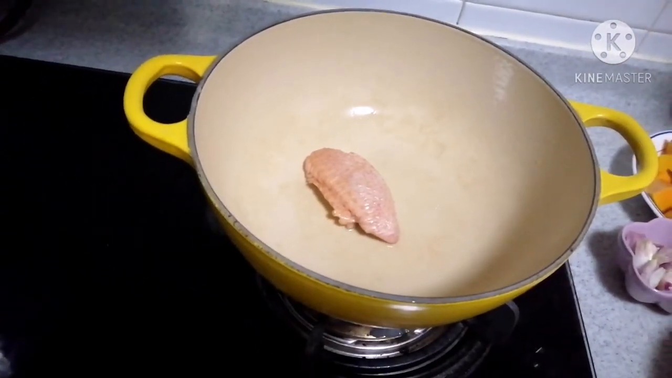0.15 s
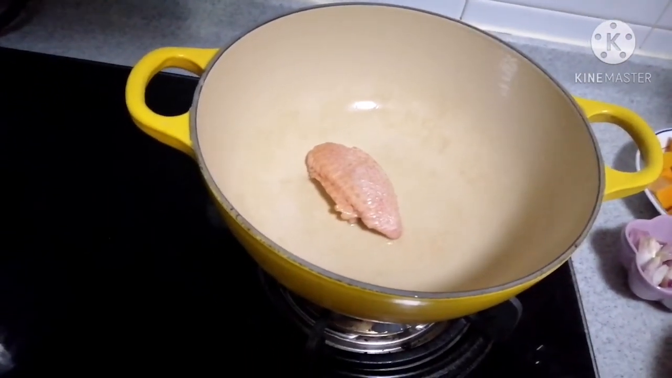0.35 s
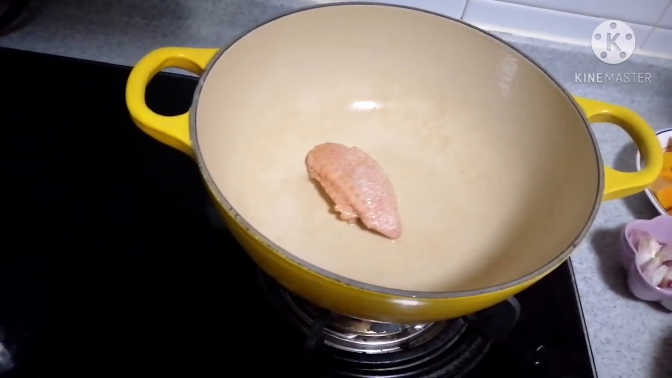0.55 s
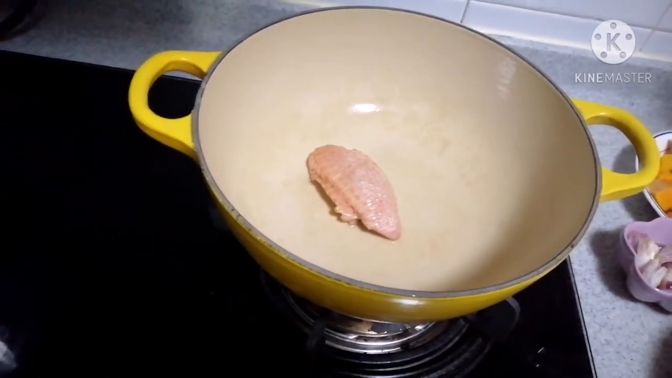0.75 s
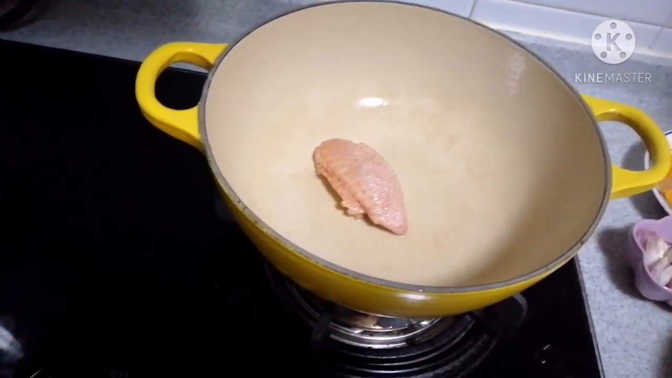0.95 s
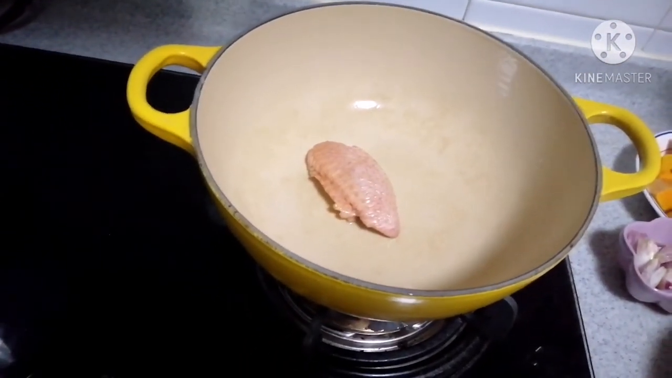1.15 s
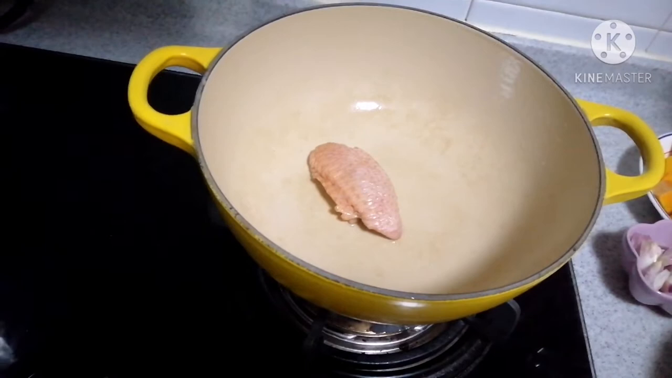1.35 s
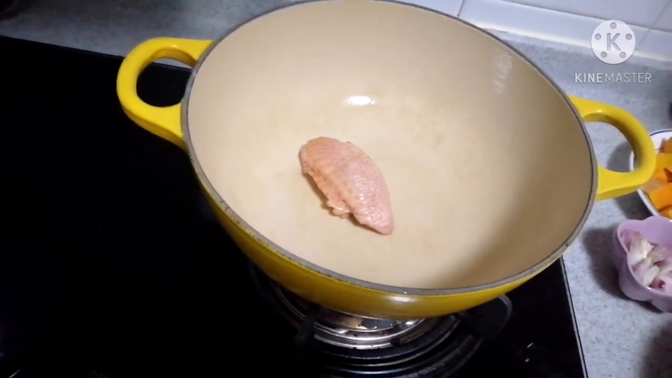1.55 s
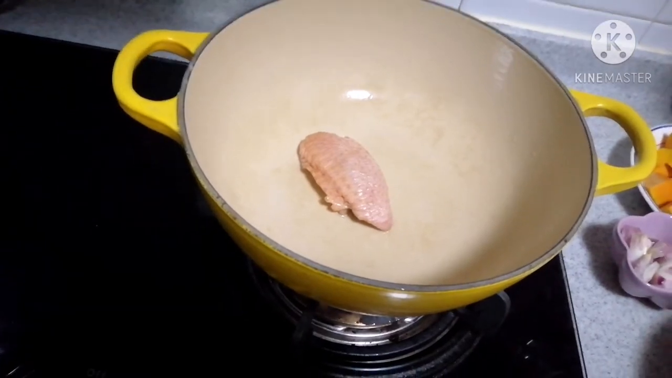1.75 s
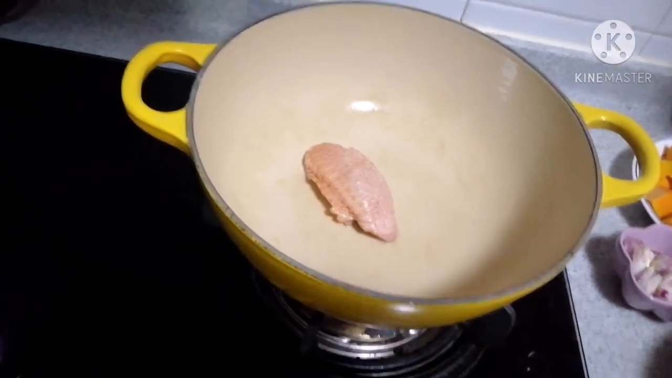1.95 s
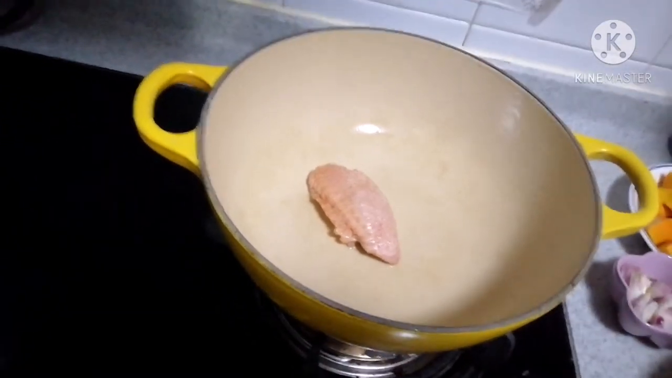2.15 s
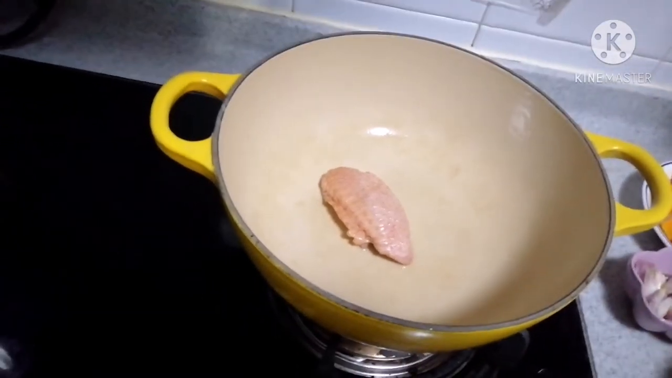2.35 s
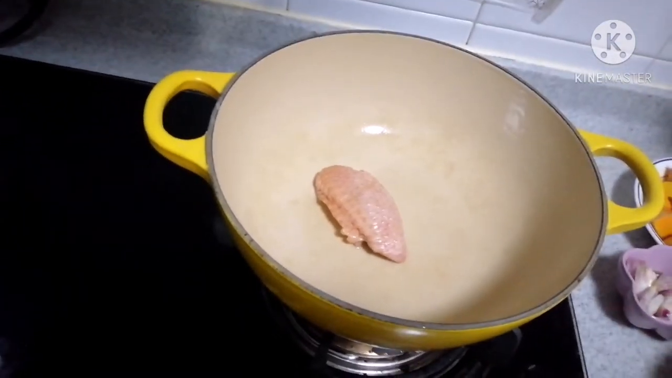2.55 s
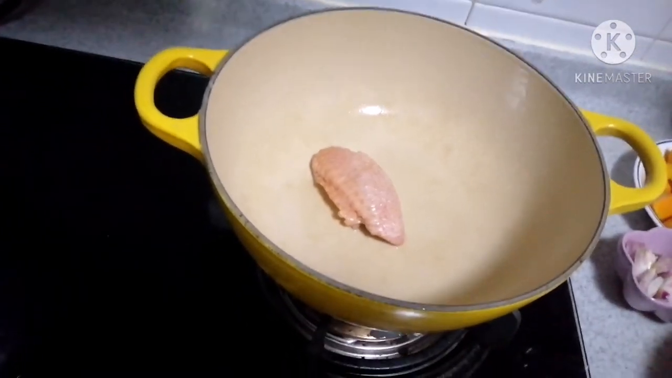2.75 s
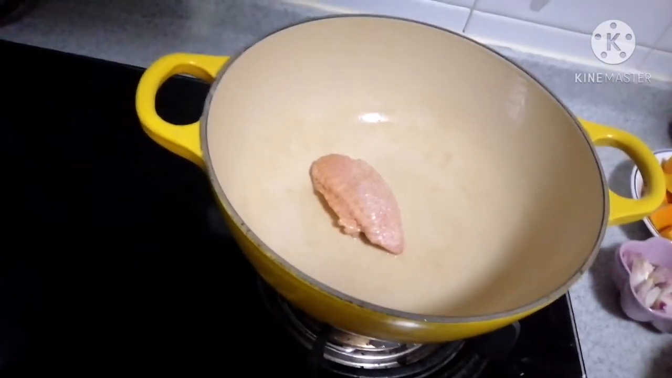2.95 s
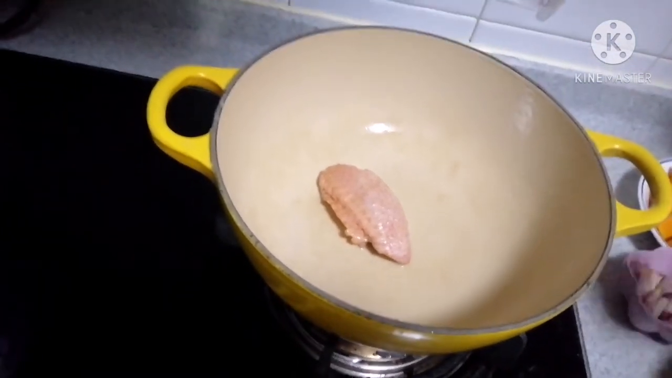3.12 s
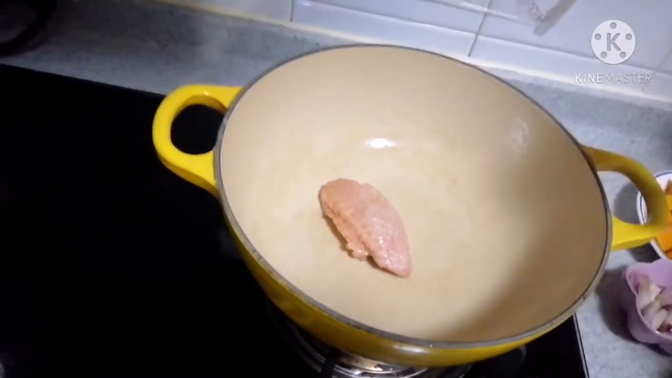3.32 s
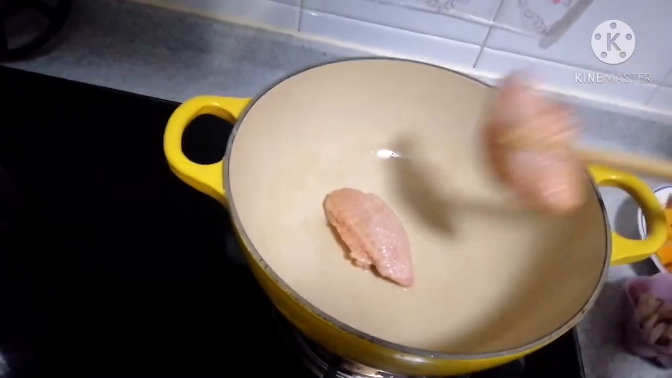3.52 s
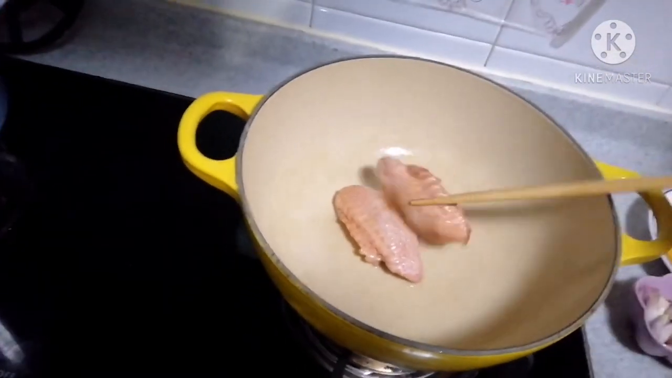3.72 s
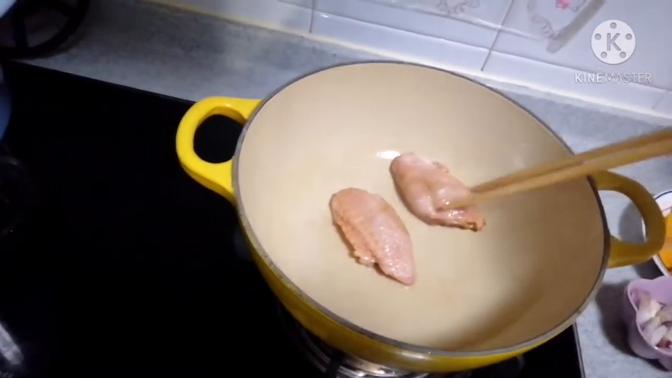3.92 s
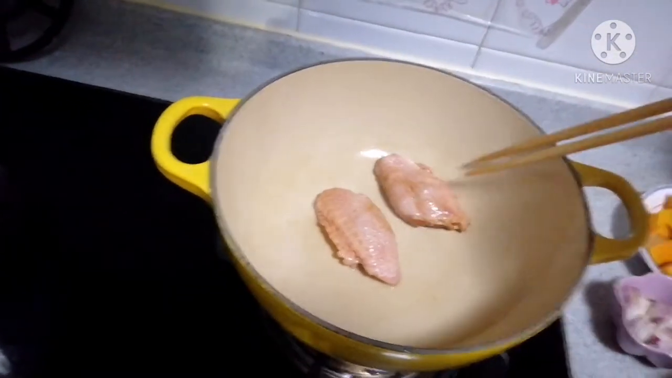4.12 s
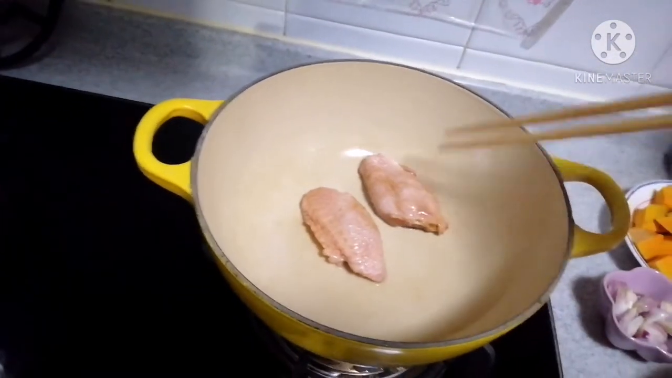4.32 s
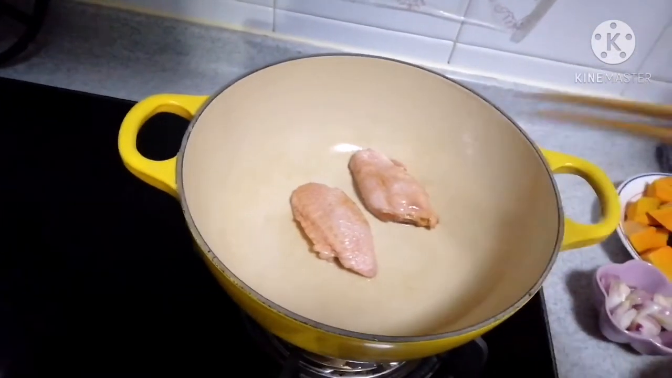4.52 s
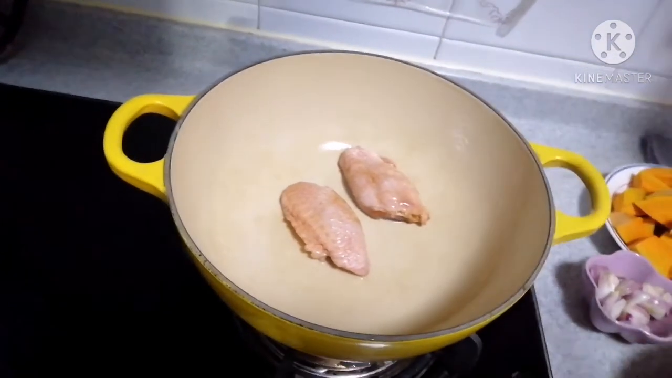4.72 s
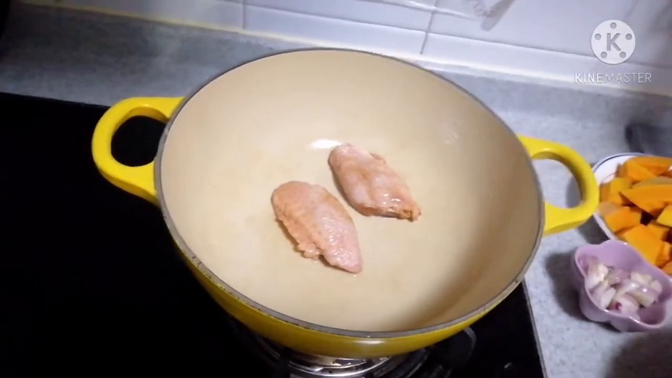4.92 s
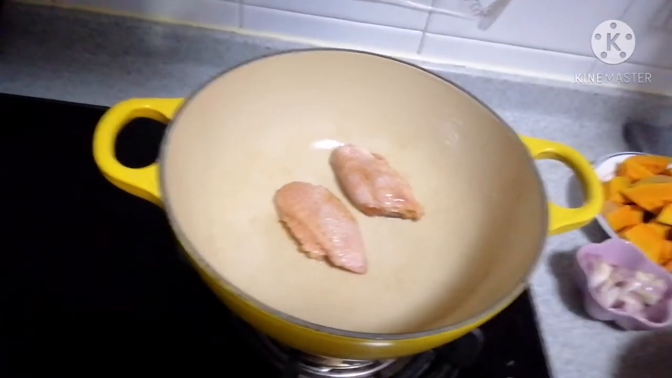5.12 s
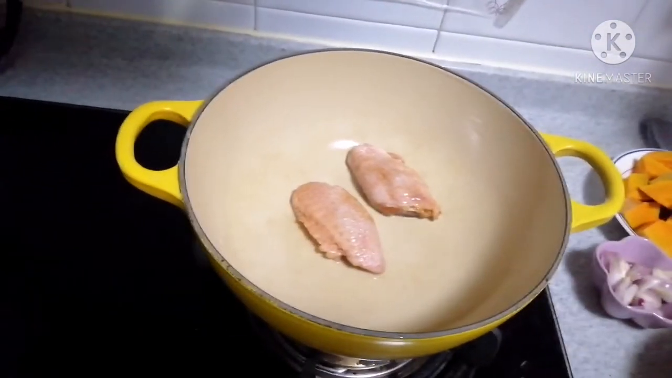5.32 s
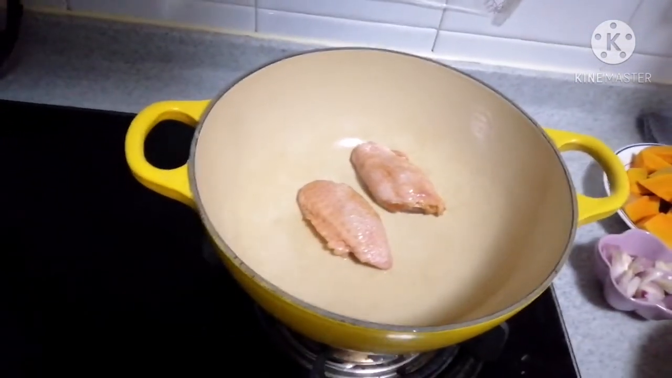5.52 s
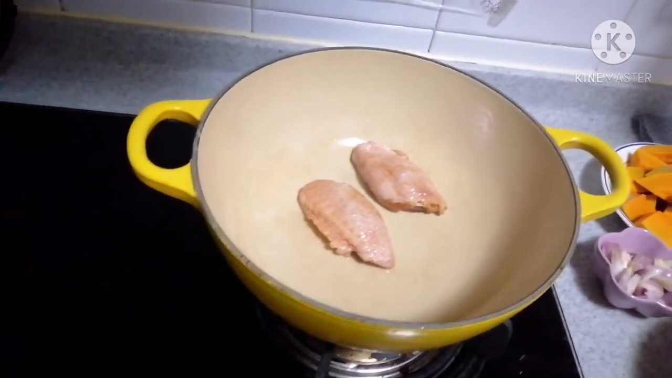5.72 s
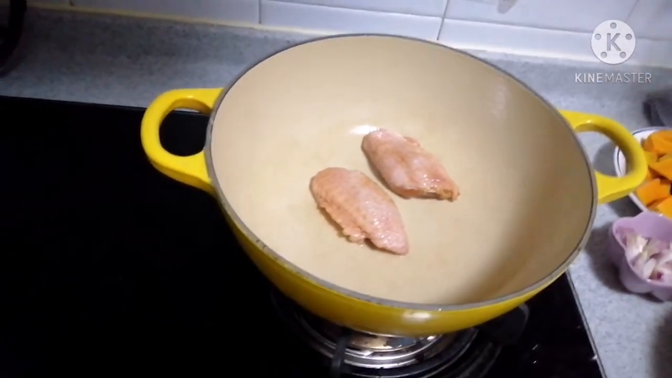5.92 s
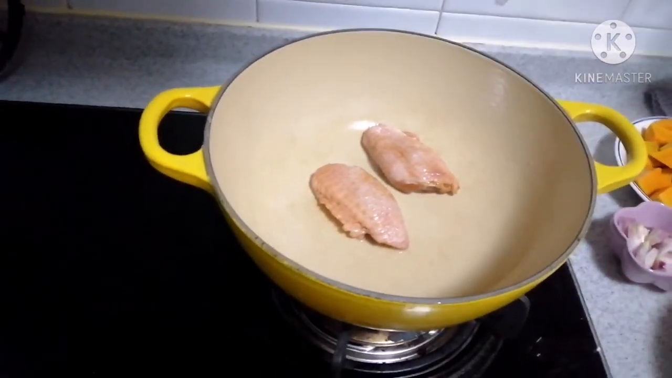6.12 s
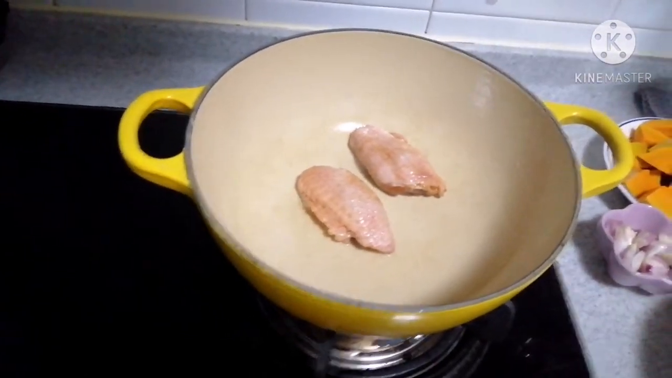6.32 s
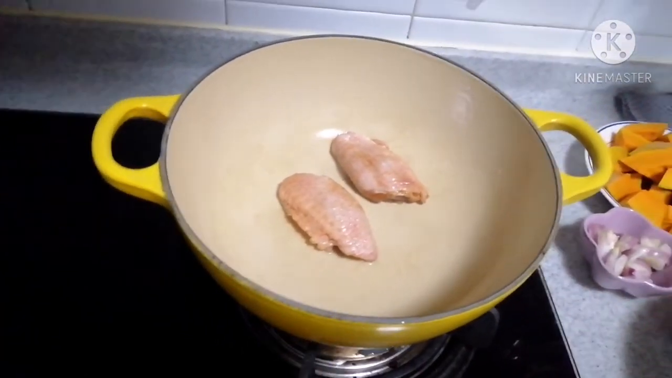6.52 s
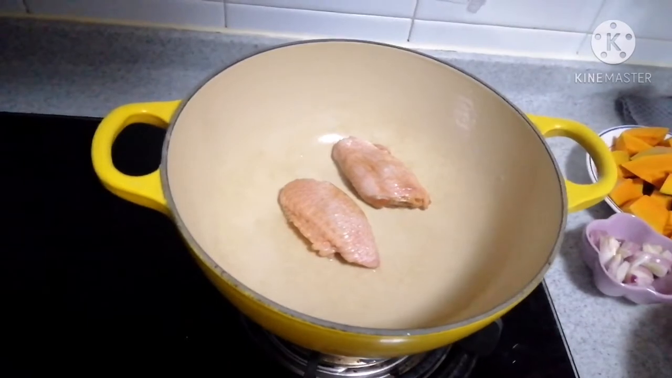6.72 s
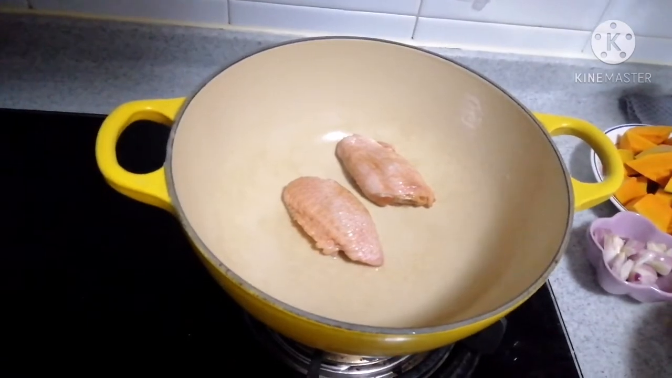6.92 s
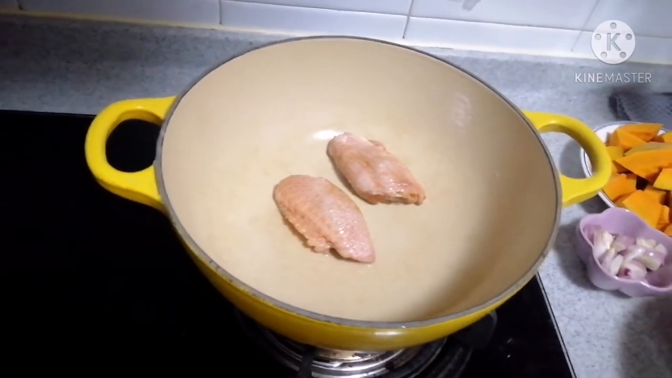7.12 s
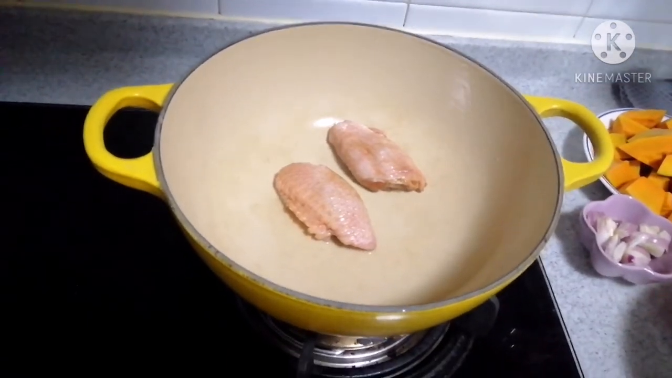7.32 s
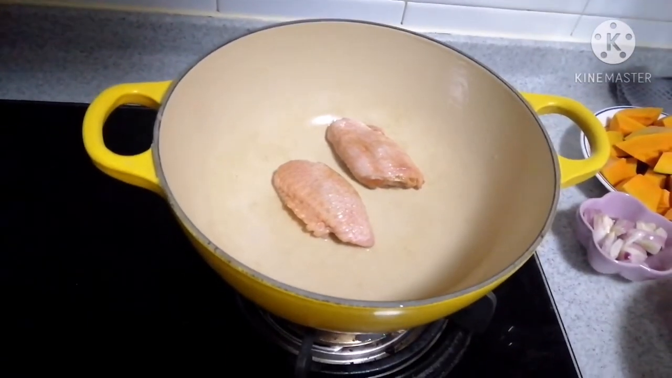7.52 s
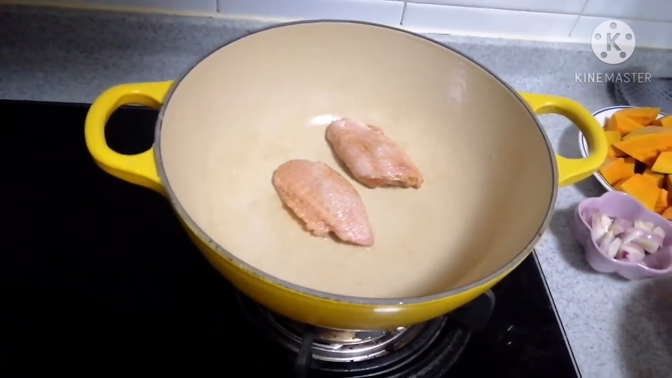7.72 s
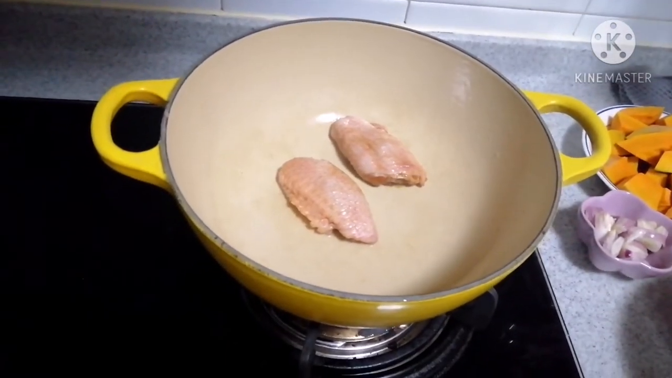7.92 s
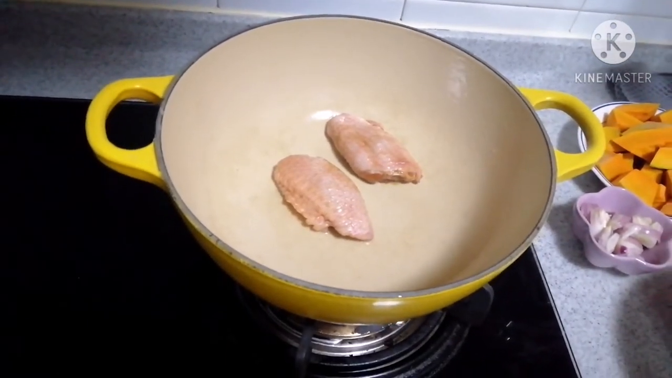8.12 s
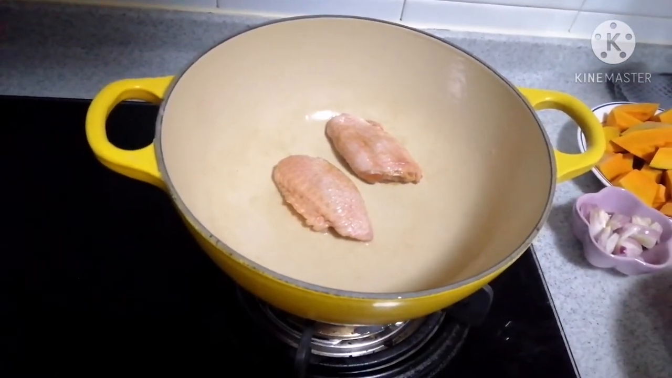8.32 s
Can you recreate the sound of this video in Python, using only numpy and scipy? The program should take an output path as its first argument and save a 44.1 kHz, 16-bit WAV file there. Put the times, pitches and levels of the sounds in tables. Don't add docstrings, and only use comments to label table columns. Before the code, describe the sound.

From 0 to 3.8 seconds a piece of chicken fries in a thin film of oil: bright, irregular clicks, snaps and spits, many each second, over a thin crackling sizzle, with occasional low, hollow bubble plops ringing in the iron pot. At about 3.8 a wetter piece lands and the sizzle quickly thickens. From 4.0 to 4.7 it is pressed, strongest from 4.3 to 4.6, forcing out a tight, whistling steam hiss, a little to the right. This stops, and a faint wavering bubbly tone seeps until 6.2. Around 5.27 something small and hard clinks in a quick bounce, followed by a loud spit near 5.5. Then a full, even, wetter sizzle continues to the end near 8.4, dotted with pops and plops. A very soft burner rumble lies underneath. Close stereo pickup, short pot reflections; level ducks slightly after loud spits.

```python
import sys
import numpy as np
from scipy import signal
from scipy.fft import rfft, irfft
from scipy.io import wavfile
from scipy.ndimage import uniform_filter1d

SR = 44100
rng = np.random.default_rng(int(sys.argv[2]) if len(sys.argv) > 2 else 0)


def how_loud(loudness_db):
    steps = np.asarray(loudness_db, float) / 20
    return 10 ** steps


def master_out(mix):
    frames = np.transpose(np.atleast_2d(mix))
    ceiling = np.clip(frames, -1, 1)
    pcm = np.round(ceiling * 32767).astype(np.int16)
    wavfile.write(sys.argv[1], SR, pcm)


N = 373086
SECOND_IN_S, PRESS_END_S = 3.815, 4.85


def rms_one(x):
    return x / np.sqrt(np.mean(x ** 2) + 1e-20)


def in_time(rows):
    s, *columns = np.transpose(rows)
    return [np.interp(np.arange(N) / SR, s, column) for column in columns]


def touch():
    return np.clip((np.arange(N) / SR - SECOND_IN_S) / .02, 0, 1)


def drift(rate):
    r = np.exp(-2 * np.pi * rate / SR)
    noise = rng.standard_normal(N + SR)
    return rms_one(signal.lfilter([1], [1, -2 * r, r * r], noise)[SR:])


def ring(clicks, hz, t60):
    r, w = how_loud(-60 / (t60 * SR)), 2 * np.pi * hz / SR
    return signal.lfilter([.5, 0, -.5], [1, -2 * r * np.cos(w), r * r], clicks + 1e-18)


def colour(x, points, lean):
    size = 4096
    log_hz = np.log(np.fft.rfftfreq(size, 1 / SR) + 1)

    def curve(rows):
        hz, db = np.transpose(rows)
        return np.interp(log_hz, np.log(hz), db)

    cepstrum = irfft(np.log(how_loud(curve(points) + curve(lean) * [[.5], [-.5]])))
    cepstrum[:, 1:size // 2] *= 2
    cepstrum[:, size // 2 + 1:] = 0
    return signal.fftconvolve(x, irfft(np.exp(rfft(cepstrum))), axes=1)[:, :N]


# delay in seconds, level in dB.
REFLECTIONS = [
    (.0018, -2.5),
    (.0027, -10),
    (.0038, -7),
]
# frequency in Hz, level in dB, t60 in seconds.
POT_MODES = [(715.3, -46, 0.21), (716, -55, 0.16), (667.5, -41.5, 0.069), (805, -33.5, 0.039),
             (883, -40, 0.092), (1101, -40.5, 0.096), (1386, -42, 0.052), (1702, -41, 0.06),
             (2490, -55, 0.051)]


def pot(lag, iron_db, left_db=-2, alike_hz=2000):
    t = np.arange(SR // 3) / SR
    noise = rng.standard_normal((3, len(t)))
    low = signal.lfilter(*signal.butter(2, alike_hz, fs=SR), noise)
    noise = low[2] + noise[:2] - low[:2]
    fall = -60 * t
    bowl = how_loud(-23 + fall / .03)
    kitchen = how_loud(-39 + fall / .45) * (t > .006)
    path = noise * (bowl + kitchen)
    path[0, lag] += how_loud(left_db)
    path[1, 0] += 1
    slips = rng.integers(-9, 10, (len(REFLECTIONS), 2))
    for (delay, db), slip in zip(REFLECTIONS, slips):
        path[[0, 1], round(delay * SR) + slip] -= how_loud(db)
    for hz, db, t60 in POT_MODES:
        wall_db = iron_db * (t60 > .1)
        path += how_loud(db + wall_db + fall / t60) * np.sin(2 * np.pi * hz * t) * [[.7], [1]]
    return path


def sizzle(points, lean, big_db, middling_db, per_s, spread_db, clump_db, cycles, iron_db, patchy_db):
    together = drift(25) + 0.63 * drift(90)
    chance = rng.random(N)
    sizes = how_loud(spread_db * np.minimum(rng.exponential(1, N), 4.5)) * rng.choice([-1, 1], N)
    pitches = np.geomspace(500, 15000, 24)
    dealt = rng.integers(0, 24, N)
    out = 0
    for spot, lag in enumerate((4, 5, 5, 6, 7, 9)):
        rate = per_s / SR * how_loud(clump_db * (.5 * together + drift(40)))
        clicks = sizes * (chance < rate)
        rings = 0
        for k in range(spot, len(pitches), 6):
            hz = pitches[k]
            burst = rms_one(ring(clicks * (dealt == k), hz, cycles / hz))
            level_db = patchy_db * drift(1.2)
            level_db = level_db + big_db * (hz < 2000) * min(hz / 1300, 1)
            level_db = level_db + middling_db * (2300 < hz < 3300)
            rings = rings + burst * np.sqrt(hz) * how_loud(level_db)
        out = out + signal.fftconvolve(rings[None], pot(lag, iron_db), axes=1)[:, :N]
    return rms_one(colour(out, points, lean))


# time in seconds, level in dB.
FIRST_LEVEL = [(0.0, -40.5), (0.06, -46), (.2, -47), (.35, -47), (.6, -47), (.87, -47.5), (1.0, -47),
               (1.5, -47.5), (2.08, -49), (2.11, -46), (2.31, -50.5), (2.4, -48), (2.59, -47.5),
               (3.35, -48), (3.56, -52), (3.72, -45), (3.75, -53), (3.79, -47)]
# frequency in Hz, level in dB.
FIRST_SPECTRUM = [(400, -19), (560, -13), (700, 3), (950, -5), (1350, 4.5), (1880, 0), (2300, 9),
                  (3500, 11), (6300, 6.5), (9300, 8), (11500, 5), (13000, -10), (15350, -7.5), (15700, -55)]
# frequency in Hz, left minus right in dB.
FIRST_BALANCE = [(60, -4), (110, -1.5), (200, -3), (380, -1), (700, -5.5), (1290, -5.5), (2380, 0.5),
                 (4400, 2.5), (8120, -7), (15000, 19.5)]


def first_piece():
    level_db, = in_time(FIRST_LEVEL + [(4.2, -47.5)])
    bursts = sizzle(FIRST_SPECTRUM, FIRST_BALANCE, 2.6 * drift(13.0) - 3, 0, per_s=1250, spread_db=2.6,
                    clump_db=.45, cycles=3.2, iron_db=4.5, patchy_db=1.0)
    return how_loud(level_db + 6.0) * bursts


# frequency in Hz, level in dB.
SECOND_SPECTRUM = [(400, -28), (530, -7.5), (720, -7.5), (950, -10.5), (1370, -2.5), (1800, -6),
                   (2700, 2.5), (3800, 3), (4700, 2.5), (6300, -4), (7600, -4), (10900, -5.5), (12800, -14),
                   (15350, -16.5), (15700, -49)]
# frequency in Hz, left minus right in dB.
SECOND_BALANCE = [(60, 8), (110, -2), (200, 20), (380, -9), (700, -1.5), (1290, -8), (2380, 0), (4400, -2),
                  (8120, -7.5), (15000, 8.5)]
# time in seconds, half length in seconds, level in dB.
LULLS = [
    (4.854, 0.054, -6),
    (5.495, 0.2, -2),
    (6.986, .055, -5),
]


def second_piece():
    t = np.arange(N) / SR
    since = np.maximum(t - SECOND_IN_S, 0)
    big_db = 1 - 26 * np.exp(-since / 0.37)
    for s, half, db in LULLS:
        big_db += db * np.exp(-((t - s) / half) ** 2)
    middling_db = -6.5 + 4 * np.exp(-((t - 5.96) / 0.63) ** 2) + 4 * drift(6.5)
    bursts = sizzle(SECOND_SPECTRUM, SECOND_BALANCE, big_db, middling_db, per_s=4000, spread_db=1.5,
                    clump_db=0.63, cycles=3.9, iron_db=1.5, patchy_db=1.5)
    level_db = -35.5 - 3 * np.exp(-since / 0.38)
    return touch() * how_loud(level_db) * bursts


# time in seconds, level in dB.
PRESS_LEVEL = [
    (3.9, -66),
    (4.05, -44),
    (4.2, -46),
    (4.3, -35),
    (4.45, -35),
    (4.6, -36),
    (4.67, -50),
    (4.86, -60),
]
# frequency in Hz, level in dB.
PRESS_SPECTRUM = [(1500, -16.5), (2800, -11), (3500, 2), (4300, 4.5), (5300, 4.5), (6200, -6), (7500, -11),
                  (10000, -5), (13000, -56)]


def pressing():
    level_db, = in_time(PRESS_LEVEL)
    hiss = sizzle(PRESS_SPECTRUM, SECOND_BALANCE, 0, 0, per_s=6400, spread_db=-2.0,
                  clump_db=3.5, cycles=19.0, iron_db=0, patchy_db=0.0)
    return touch() * how_loud(level_db) * hiss * how_loud([[-2.5], [1.5]])


def pops(rows, cycles, crack, extra_db, spray):
    out = np.zeros((2, N + SR))
    paths = [pot(lag, iron_db=6.0) for lag in (5, 7, 11)]
    click = np.eye(1, 900)[0]
    bright = signal.sosfilt(signal.butter(2, [3000, 12000], "band", fs=SR, output="sos"), click)
    soft = signal.butter(4, 11300, fs=SR, output="sos")
    dull = ring(click, 1650, 0.0014)
    fading = np.exp(-np.arange(len(click)) / (.0025 * SR))
    sprays = click + spray * rng.standard_normal((len(rows), len(click))) * fading
    for k, (s, db, hz, pan_db, thump_db) in enumerate(rows):
        own = signal.lfilter(*signal.butter(2, .6 * hz, "high", fs=SR), ring(click, hz, cycles / hz))
        burst = np.convolve(crack * bright + own, sprays[k])[:len(click)]
        burst = signal.sosfilt(soft, burst + how_loud(thump_db) * dull)
        heard = signal.fftconvolve(burst[None], paths[k % 3], axes=1)
        level = how_loud(db + extra_db + pan_db * np.array([[.5], [-.5]]))
        heard = heard / abs(heard.mean(axis=0)).max() * level
        at = round((s + .0006) * SR)
        out[:, at:at + heard.shape[1]] += heard
    return out[:, :N]


def placed(rows):
    out = []
    for s, db, hz, thump_db in rows:
        lean_db = -10 if SECOND_IN_S < s < PRESS_END_S else -2.5
        out.append((s, db, hz, lean_db + 3.5 * rng.standard_normal(), thump_db + 4))
    return out


# time in seconds, peak in
# dB, pitch in Hz, thump in dB.
EARLY_SPITS = [(0.066, -23, 10400, -26), (0.0907, -26.5, 3700, -6), (0.1221, -24, 8000, -19),
               (0.1463, -22, 3920, -11), (0.2139, -37, 2420, -25), (0.2219, -41, 3130, -29),
               (0.248, -29, 9110, -31), (0.2668, -36, 2830, -15), (0.2862, -32, 2210, -24),
               (0.321, -33, 2320, -21), (0.3491, -23.5, 9400, -33), (0.3865, -28, 5590, -35),
               (0.4, -27, 4710, -28), (0.4459, -35, 7700, -18), (0.4688, -31, 8020, -27),
               (0.4928, -29, 11400, -36), (0.5062, -36, 5850, -34), (0.5312, -37, 11200, -26),
               (0.5516, -30, 2320, -5), (0.5636, -16.5, 5460, -9.5), (0.6315, -42, 3360, -16),
               (0.6323, -26, 2140, -29), (0.6747, -36, 2430, -22), (0.7173, -34, 3600, -4),
               (0.7532, -37, 4900, -24), (0.7612, -37, 11300, -19), (0.7687, -29, 2100, -24),
               (0.791, -29, 4120, -14), (0.823, -36, 4100, -24), (0.8395, -30, 9300, -13),
               (0.8659, -40, 9690, -26), (0.894, -32, 4410, -22), (0.9176, -27, 9050, -18),
               (0.949, -23, 9240, -11), (0.9696, -23, 8970, -29), (1.0106, -41, 2740, -29),
               (1.017, -32.5, 2780, -24), (1.0457, -26, 5470, -34), (1.0702, -30, 9020, -35),
           (1.0817, -28, 5190, -30), (1.1057, -41, 9190, -23), (1.1473, -31, 2820, -24),
           (1.171, -23, 6500, -15), (1.171, -29, 9490, -16), (1.201, -31, 7670, -22),
           (1.241, -37, 7410, -23), (1.2643, -35, 9270, -19), (1.2797, -24, 8100, -22),
           (1.293, -30, 2850, -28), (1.335, -25, 5920, -22), (1.3657, -29, 3610, -32),
           (1.3715, -26.5, 2440, -24), (1.39, -23, 9210, -18), (1.4204, -30, 8980, -28),
           (1.4449, -36, 8890, -27), (1.4785, -41, 3630, -29), (1.5003, -33, 2450, -20),
           (1.5202, -27, 7640, -24), (1.5501, -43, 6440, -19), (1.562, -34, 4110, -25),
           (1.59, -27, 5510, -25), (1.611, -35, 2390, -13), (1.647, -37, 2100, -8),
           (1.6534, -26, 9160, -14), (1.7083, -34, 7640, -17), (1.7083, -28.5, 8720, -13),
           (1.7422, -27, 9240, -23), (1.7644, -34, 2780, -27), (1.8016, -37, 7700, -28),
           (1.8101, -35, 7720, -28), (1.849, -31, 10300, -14), (1.866, -38, 11200, -18),
           (1.8846, -27, 6850, -32), (1.9098, -34, 10700, -21), (1.9308, -31, 7500, -19),
           (1.9657, -31, 6870, -26),
               (2.0253, -31, 5120, -17), (2.0253, -40, 8650, -20), (2.08, -28, 9270, -19),
           (2.0995, -33, 3500, -4), (2.1096, -44, 3540, -15), (2.109, -31, 9100, -17),
           (2.1372, -23, 9470, -28), (2.169, -18, 6560, -31), (2.1979, -26, 4000, -30),
           (2.2109, -23, 5760, -30), (2.2293, -27, 5500, -30), (2.2648, -25, 9290, -20),
           (2.3064, -32, 9520, -12), (2.3396, -36, 4260, -10), (2.3396, -33, 8800, -14),
           (2.35, -34, 2680, -21), (2.374, -26, 8860, -31), (2.3861, -22, 7780, -31),
           (2.4107, -24, 9400, -20), (2.4439, -25, 7140, -35), (2.4947, -32, 9460, -31),
           (2.5052, -36, 9540, -29), (2.5531, -48, 5500, -20), (2.5805, -28, 8930, -11),
           (2.601, -30, 9370, -21), (2.615, -26, 8240, -20), (2.6299, -21, 7450, -23),
           (2.685, -37, 7780, -32), (2.6953, -27, 9540, -27), (2.7172, -38, 9260, -11),
           (2.7873, -25, 4620, -28), (2.7956, -27, 9220, -22), (2.832, -28, 7640, -20),
           (2.8449, -30, 2510, -25), (2.8784, -31, 2530, -28), (2.904, -35, 7980, -16),
               (2.9064, -33, 7990, -17), (2.9288, -24, 10900, -20), (2.9732, -50, 2240, -30),
           (3.0181, -33, 8800, -24), (3.0241, -33, 8010, -13), (3.052, -39, 3530, -9),
           (3.111, -26.5, 4890, -26), (3.1624, -26, 8700, -24), (3.174, -32, 5740, -25),
           (3.2187, -30, 4900, 1), (3.2516, -29.5, 9490, -8), (3.3074, -31, 10800, -21),
           (3.3309, -28.5, 5630, -18), (3.3578, -29, 7720, -29), (3.4026, -33, 6120, -27),
           (3.4032, -22, 5940, -27), (3.4421, -36, 7760, -27), (3.4676, -27, 9430, -29),
           (3.482, -24, 8720, -33), (3.505, -28, 8660, -25), (3.5279, -26, 8960, -20),
           (3.5634, -42, 3060, -17), (3.5625, -26.5, 2950, -31), (3.6043, -41, 5600, -24),
           (3.6182, -26.5, 5910, -21), (3.627, -25.5, 7160, -22), (3.6512, -27.5, 7920, -13),
           (3.69, -23.5, 4980, -12), (3.707, -26, 5750, -25), (3.722, -23, 9100, -31),
           (3.772, -26.5, 5400, -32), (3.7864, -23, 9200, -26), (3.797, -25, 5000, -14),
           (3.807, -26, 2620, -10), (3.832, -21.5, 6020, -24), (3.8692, -25.5, 4690, -32),
           (3.9121, -28.5, 6950, -29)]
# time in seconds, peak in dB, pitch in Hz, thump in
# dB.
LATE_SPITS = [(3.9734, -19, 5800, -18), (4.0612, -21, 4700, -29), (4.2097, -19, 5460, -25),
              (4.2852, -21, 5110, -31), (4.298, -19.5, 4750, -23), (4.4424, -23, 5170, -30),
              (4.5594, -25, 3710, -21), (4.5734, -24, 4270, -10), (4.7024, -18, 4200, -28),
              (4.7684, -22.5, 4300, -19), (4.9137, -19.5, 2870, -10), (4.9354, -31, 2903, -30),
              (5.076, -29, 3820, -23), (5.1424, -20, 5360, -27), (5.2003, -27, 5400, -18),
              (5.2744, -17, 7440, -33), (5.441, -30, 2930, -25), (5.4822, -14, 4000, -30),
              (4.217, -18, 5400, -29),
              (5.5562, -25, 3500, -21), (5.654, -26, 2560, -17), (5.8091, -24, 7390, -20),
              (5.8964, -25, 2590, -21), (5.9937, -20, 3090, -27), (6.1918, -24, 3130, -21),
              (6.2232, -22, 5570, -25), (6.4517, -24, 3780, -21), (6.4741, -25, 5020, -21),
              (6.515, -24, 4500, -22), (6.5335, -19, 3760, -27), (6.8188, -25, 3530, -20),
              (6.9041, -19, 3920, -25), (6.9435, -25, 3530, -24), (6.9645, -24, 5520, -22),
              (7.0408, -19, 4570, -25), (7.0832, -23, 5000, -23), (7.1077, -25, 4600, -20),
              (7.3426, -23, 3550, -18), (7.4823, -26, 2880, -14), (7.628, -23, 5610, -20),
              (7.6465, -27, 2450, -17), (7.7537, -27, 4580, -18), (7.7722, -26, 5590, -21),
              (7.8889, -23, 3550, -22), (7.9637, -27, 3650, -17), (8.073, -26, 5020, -18),
              (8.1358, -25, 2860, -20), (8.1867, -26, 5050, -18), (8.2042, -24, 4450, -15),
              (8.3494, -26, 2770, -19), (8.3718, -23, 2720, -23)]


def spits():
    early = placed(EARLY_SPITS)
    late = placed(LATE_SPITS)
    out = pops(early, cycles=7.5, crack=0.36, extra_db=-4.5, spray=.08)
    return out + pops(late, cycles=16.0, crack=0.68, extra_db=-9.0, spray=.05)


# time in
# seconds, peak in dB, pitch in Hz, left minus right in dB, thump in dB.
SHARP_SNAPS = [(.004, -22, 5000, -2, -14), (.4688, -32, 3000, -1, -8), (.5645, -24, 8800, -3, -14),
               (1.5003, -30, 5000, -2, -20), (2.1096, -22, 3500, -4, -6), (2.685, -26, 5000, -3, -12),
               (2.5533, -25, 5500, -4, -18), (3.0522, -26, 3000, -1, -10), (5.2605, -22, 6500, -5, -22),
               (5.4622, -25, 4700, -4, -25), (5.4822, -26, 4100, -3, -25), (5.9945, -24, 4000, -3, -25),
               (6.9045, -25, 3500, -2, -10), (7.0412, -25, 3000, -1, -8), (1.8849, -32, 5500, -3, -18),
               (2.0255, -32, 4500, -2, -14), (3.3578, -31, 6000, -3, -20)]


def snaps():
    return pops(SHARP_SNAPS, cycles=4.5, crack=.6, extra_db=0, spray=.05)


# time
# in seconds, peak in dB, pitch in Hz.
BUBBLE_PLOPS = [(0.09, -35, 710), (0.146, -54, 623), (0.284, -27, 2160), (0.551, -20, 2260),
                (0.636, -31.5, 644), (1.135, -31.5, 716), (1.19, -35.5, 720), (1.39, -33, 704),
                (1.5, -36, 715), (1.55, -32.5, 724), (1.647, -29.5, 1600), (1.863, -24.5, 1340),
                (1.972, -34, 1390), (2.033, -32, 750), (2.35, -32, 720), (2.58, -30, 860), (2.713, -24, 710),
                (2.844, -28, 770), (3.05, -27.5, 716), (3.106, -29.5, 1610), (3.147, -36, 660),
                (3.29, -31, 724), (3.69, -33, 670), (4.336, -24.5, 780), (4.41, -33, 722), (4.483, -26, 770),
                (4.6, -26.5, 740), (4.532, -27, 710), (4.689, -29, 716),
                (4.0, -38, 713), (4.03, -36, 720), (4.07, -44, 719), (4.136, -45, 700), (4.187, -35, 710),
                  (4.247, -37, 700), (4.3, -33, 711),
                (5.521, -22, 1270),
    (7.035, -28, 716),
    (7.52, -23, 1490),
    (7.884, -33, 640),
    (8.175, -23, 715),
    (8.207, -24, 1350),
]


def plops():
    rows = [(*row, -3, -40) for row in BUBBLE_PLOPS]
    return pops(rows, cycles=8.0, crack=.02, extra_db=-10.0, spray=0)


def narrow_bubbles(rows, t60):
    level_db, hz = in_time(rows)
    clicks = rng.standard_normal(N) * (rng.random(N) < 1100 / SR)
    swing = rms_one(signal.lfilter([1], [1, -how_loud(-60 / (t60 * SR))], clicks))
    rings = swing * np.sin(2 * np.pi * np.cumsum(hz) / SR)
    heard = signal.fftconvolve(rings[None], pot(5, iron_db=-3), axes=1)[:, :N]
    return how_loud(level_db) * rms_one(heard)


# time in seconds, level in dB, pitch in Hz.
JUICE = [
    (4.75, -70, 2990),
    (4.95, -52, 2900),
    (5.4, -43.5, 2840),
    (5.75, -46.5, 2752),
    (6.2, -49, 2887),
    (6.24, -70, 2900),
]


def seep():
    return narrow_bubbles(JUICE, t60=0.019)


# time in seconds, level in dB, pitch in Hz.
HIGH_GAP = [
    (3.98, -62, 5400),
    (4.1, -48, 5370),
    (4.3, -46, 5090),
    (4.5, -47, 5110),
    (4.7, -63, 4920),
]
# time in seconds, level in dB, pitch in Hz.
LOW_GAP = [
    (3.98, -62, 3730),
    (4.1, -51, 3760),
    (4.45, -44, 3640),
    (4.56, -42, 3620),
    (4.75, -60, 3510),
]


def whistles():
    both = narrow_bubbles(HIGH_GAP, t60=0.011) + narrow_bubbles(LOW_GAP, t60=0.0056)
    return touch() * both * how_loud([[-5], [1.5]])


# time in seconds, peak in dB.
TOUCHES = [
    (5.26, -23),
    (5.2745, -23),
    (5.295, -25),
]
# frequency in Hz, level in dB, t60 in seconds.
HARD_MODES = [(4930, -5, 0.025), (6520, -9, 0.084), (7380, -12, 0.14), (9030, -11, 0.056),
              (9100, -6, 0.032)]


def clinks():
    out = np.zeros((2, N))
    at = [round(s * SR) for s, db in TOUCHES]
    peak_db = np.array(TOUCHES)[:, 1]
    for hz, level_db, t60 in HARD_MODES:
        clicks = np.zeros((2, N))
        scatter_db = rng.normal(0, 3.3, (2, len(at)))
        clicks[:, at] = how_loud(peak_db + level_db + scatter_db - [[7], [0]])
        out += ring(clicks, hz, t60)
    return out


# frequency in Hz, level in dB.
RUMBLE_SPECTRUM = [(12, -34), (20, 8), (33, -3.5), (64, -7), (119, 4.5), (188, -8.5), (227, -5.5),
                   (269, -11.5), (320, -8.5), (433, -13.5), (620, -11), (810, -13.5), (1360, -120)]


def burner():
    mid, side = rng.standard_normal((2, N))
    side = 0.046 * side + 0.56 * signal.lfilter(*signal.butter(1, 350, "high", fs=SR), side)
    rumble = rms_one(colour(mid + side * [[1], [-1]], RUMBLE_SPECTRUM, FIRST_BALANCE))
    after = np.arange(N) / SR - TOUCHES[0][0]
    duck_db = 17 * (after > 0) * np.exp(-(after / 0.054) ** 2)
    return how_loud(-58.5) * rumble * how_loud(-1.5 * touch() - duck_db)


def scene():
    frying = first_piece() + second_piece() + pressing()
    bursts = spits() + snaps() + plops()
    juice = seep() + whistles()
    return frying + bursts + juice + clinks() + burner()


# time in seconds, dip in dB.
GAIN_DIPS = [
    (.57, 2),
    (2.17, 2),
    (4.84, 2),
    (5.285, 4.5),
    (5.488, 2.5),
    (6.228, 3),
    (6.92, 1.5),
]


def roll_off(x):
    return signal.sosfilt(signal.butter(12, 16400, fs=SR, output="sos"), x)


def record(dry):
    t = np.arange(N) / SR
    dip_db = np.zeros(N)
    for s, db in GAIN_DIPS:
        dip_db += db * (t > s) * np.exp(-np.maximum(t - s, 0) / .13)
    top = signal.cheby2(10, 45, 16100, fs=SR, output="sos")
    mix = signal.sosfilt(top, dry * how_loud(-uniform_filter1d(dip_db, size=200)))
    return roll_off(mix)


dry = scene()
out = record(dry)
master_out(out)
```